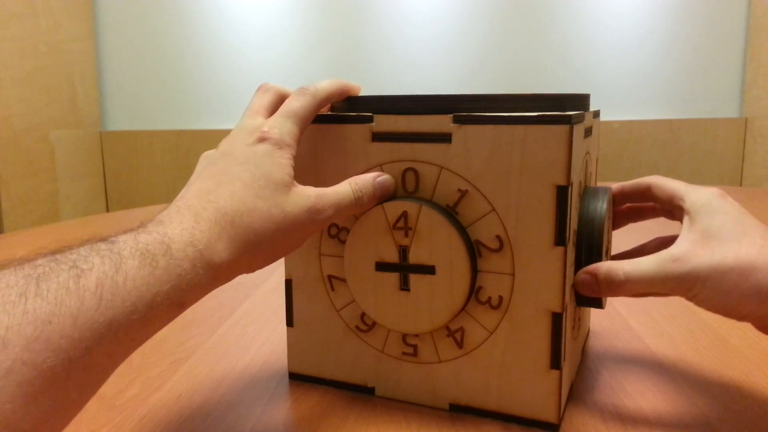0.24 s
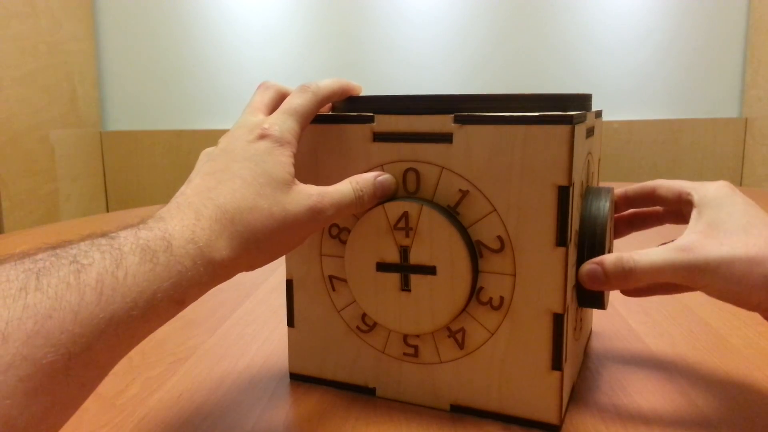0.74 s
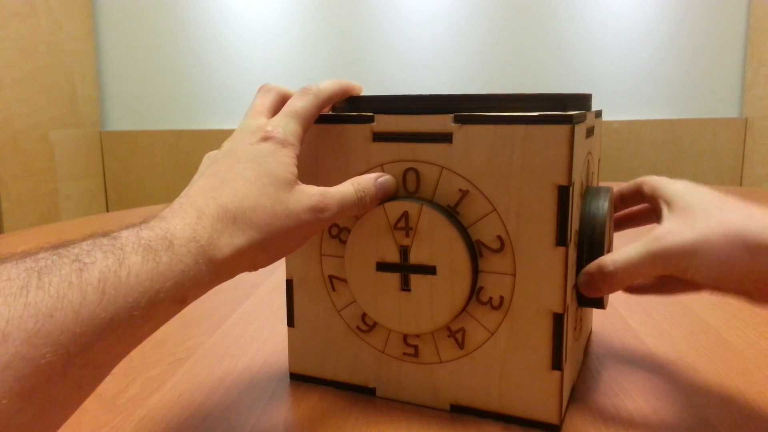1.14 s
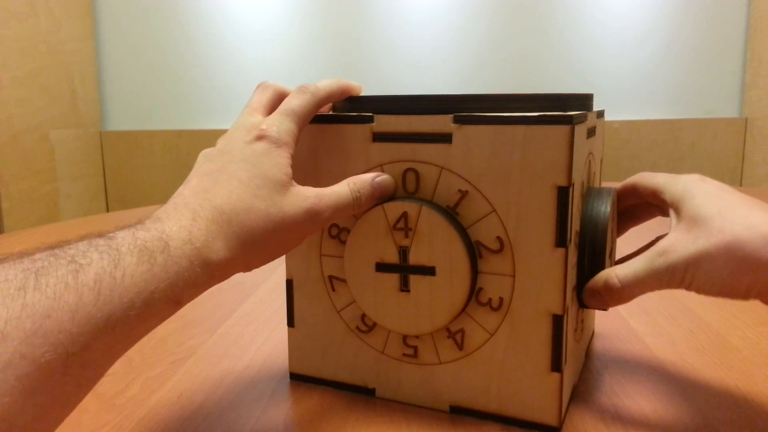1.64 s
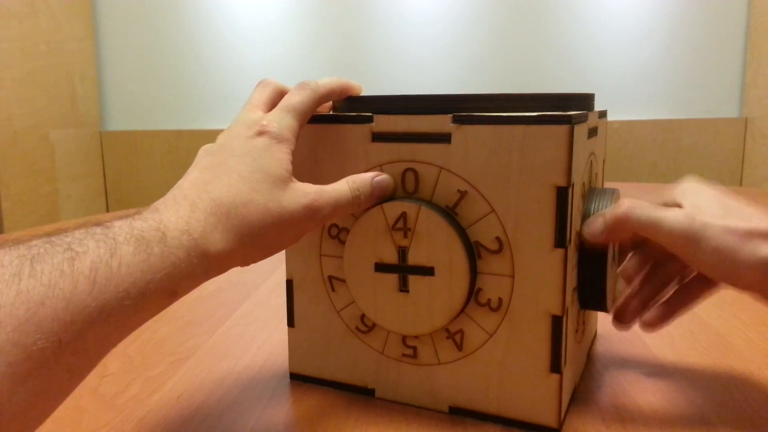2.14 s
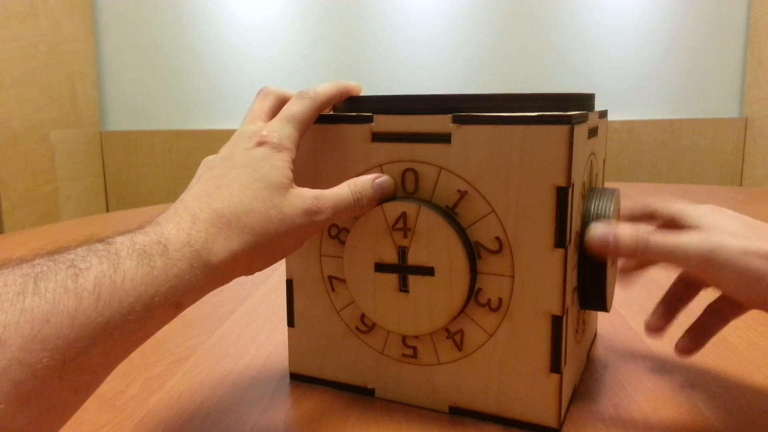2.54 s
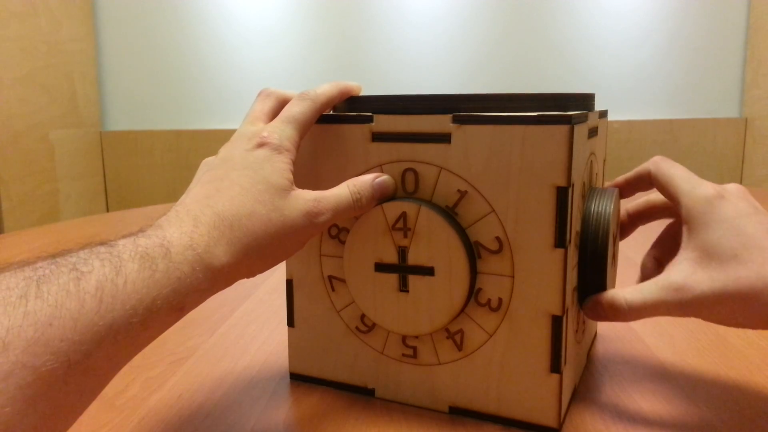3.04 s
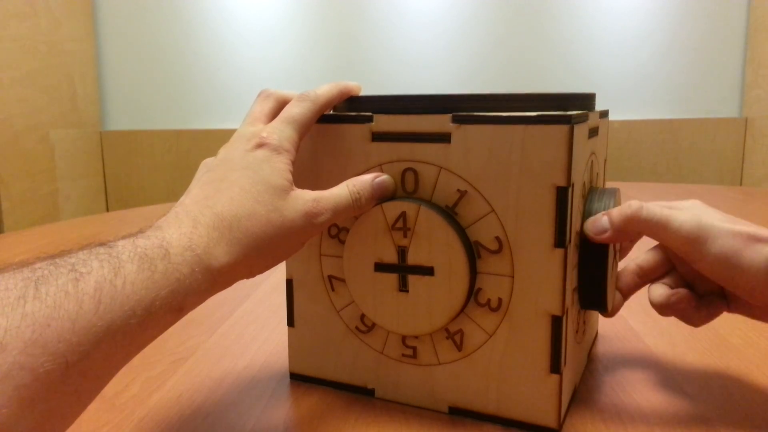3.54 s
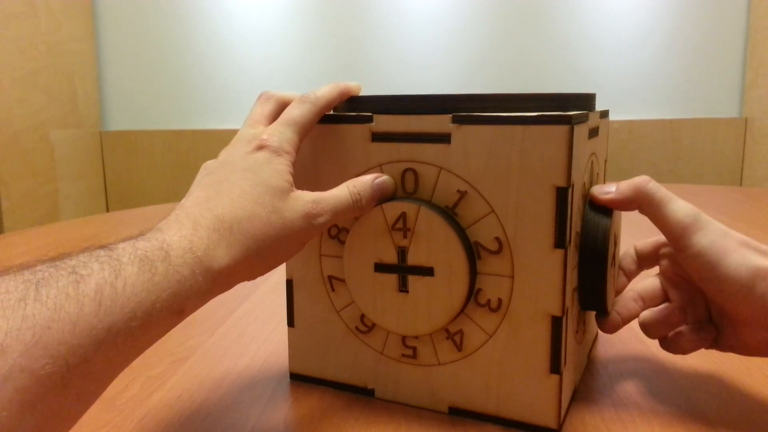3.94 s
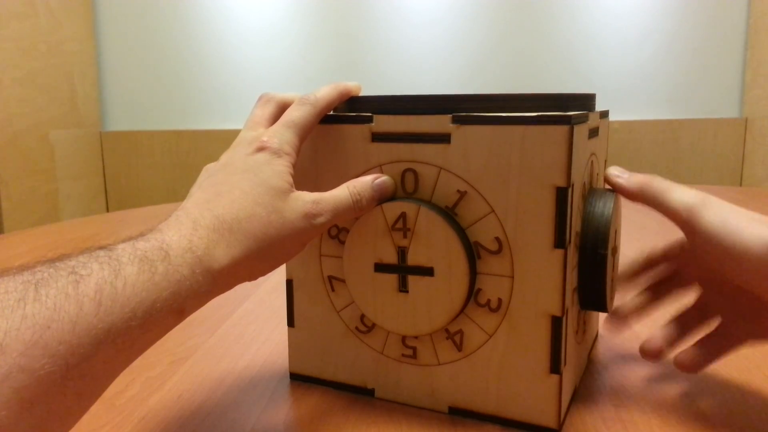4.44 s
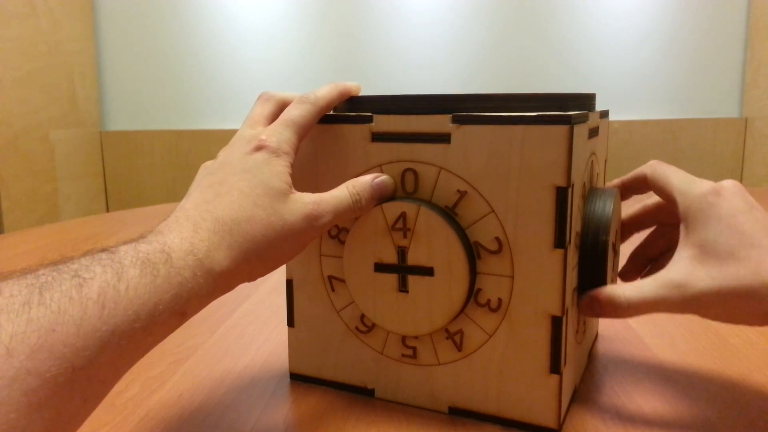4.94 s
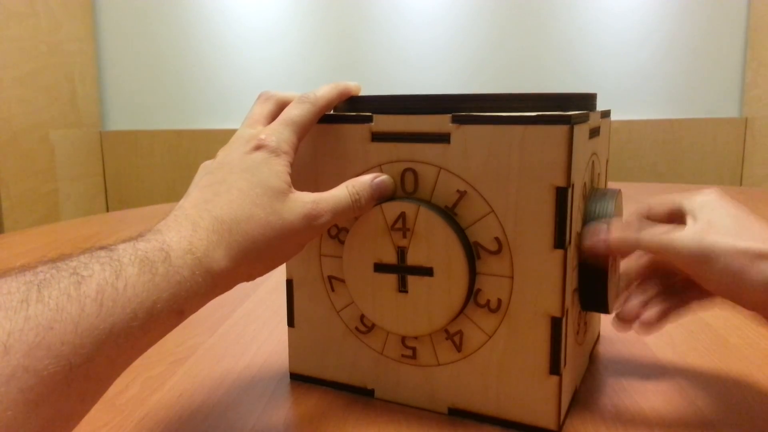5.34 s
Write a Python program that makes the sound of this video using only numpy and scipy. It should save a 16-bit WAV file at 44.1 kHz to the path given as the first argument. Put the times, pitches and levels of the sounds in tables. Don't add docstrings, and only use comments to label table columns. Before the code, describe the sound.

Close stereo pickup of a hollow plywood box on a table in a small hard room. Soft taps, ticks and faint rubbing fill the first two seconds; then a wooden dial slides and knocks into place in quick bouncing clusters, with dry scrapes before each, growing heavier towards the end over quiet hiss.

```python
import sys
import numpy as np
from scipy import signal
from scipy.fft import rfft, irfft
from scipy.io import wavfile

SR = 44100
rng = np.random.default_rng(int(sys.argv[2]) if len(sys.argv) > 2 else 0)


def transcribe(signal):
    frames = np.atleast_2d(signal).T
    limited = np.clip(frames, -1, 1)
    pcm = np.round(limited * 32767).astype(np.int16)
    wavfile.write(sys.argv[1], SR, pcm)


def nominal_scale(level):
    x = np.asarray(level, float) / 20
    return 10 ** x


N = 246959
T = np.arange(N) / SR

# [t/s, peak level/dB, struck panel f/Hz, clack level/dB]
STOPS = [
    [(2.056, -5, 298, -4), (2.078, -14.5, 490, -10), (2.098, -21, 476, 17), (2.127, -17.5, 505, -22)],
    [(2.2, -12, 406, -14), (2.214, -9.5, 403, -7)],
    [(3.277, -23, 590, -4), (3.29, -16, 546, -9)],
    [(3.519, -15.5, 516, 1.5), (3.536, -11, 387, -6), (3.546, -25, 540, -14)],
    [(3.823, -4, 550, -21), (3.841, -6, 570, -6), (3.852, -9, 485, -18), (3.87, -14.5, 420, -25)],
    [(4.212, -4.5, 505, -14.5), (4.219, -17, 297, -14), (4.234, -14, 427, -12)],
    [(5.077, -6, 418, -1.5), (5.081, -6, 600, -11.5), (5.092, -3.5, 486, -24), (5.108, -14, 312, -16)],
    [(5.408, -9, 416, -20), (5.416, -6, 615, 2), (5.427, -7, 380, -22), (5.445, -22.5, 340, -24)],
]
# [shove of the whole box level/dB, ring length left by the grip/ratio]
PUSHES = [(-11.5, 0.51), (-10, 0.52), (-11, 0.21), (-16, 0.62), (-8.5, 0.53), (-3.5, 0.69), (8.5, 0.72),
          (0, 0.48)]
# [t/s, peak level/dB, struck panel f/Hz, clack level/dB]
TAPS = [(0.033, -22, 362, -15), (0.074, -47, 430, -12), (0.175, -43, 590, 24), (0.579, -29.5, 530, -6.5),
        (0.653, -22.5, 323, -2), (0.679, -28.5, 338, -2), (0.844, -40, 270, -8), (1.15, -27.5, 550, 21),
        (1.168, -22, 520, -7), (1.222, -29, 450, 11), (1.309, -13.5, 366, -9), (1.349, -28.5, 344, -3),
        (1.476, -29, 458, -16), (1.741, -36, 363, -4), (1.804, -40, 322, 3), (1.9, -32, 570, -3),
        (2.518, -38.5, 281, -6), (4.052, -41, 513, 4), (4.449, -38.5, 295, -1), (4.622, -40.5, 297, 4),
        (4.919, -34, 517, -18)]
# [f/Hz, level/dB, t60/s]
PANELS = [(152, -9, 0.032), (236.9, -15, 0.18), (318, -3, 0.038), (352, 0, 0.045), (417.3, 5, 0.045),
          (502.6, 8, 0.059), (611, 0, 0.041), (836, -0.5, 0.017), (963, -3.5, 0.02), (1150, -59, 0.12),
          (1150, -51, 0.055), (1667, -19, 0.016)]
# [t/s, peak level/dB, ring f/Hz]
TICKS = [(0.0312, -39.5, 1840), (0.5788, -26, 2060), (0.5795, -35, 4330), (0.655, -29, 1300),
         (1.144, -30, 4230), (1.1625, -22, 2590), (1.3107, -27, 3520), (1.7417, -43, 2200),
         (1.9041, -28.5, 1820), (1.9007, -38, 1100), (2.056, -17.5, 1680), (2.057, -24.5, 4540),
         (2.066, -14, 1970), (2.2009, -11.5, 2200), (2.2098, -26, 2300), (2.226, -27, 1910),
         (3.2905, -19, 1880), (3.5386, -28, 3920), (3.822, -17.5, 3360), (3.8396, -17.5, 4630),
         (4.0514, -39, 1860), (4.2122, -5.5, 2500), (5.074, -20, 4970), (5.0813, -8, 2130),
         (5.0887, -17, 2280), (5.4265, -39, 2270)]
# [t/s, peak level/dB]
SNAPS = [(0.088, -30), (0.0974, -42), (0.5796, -58), (1.309, -35), (1.7035, -29), (2.056, -30),
         (2.1101, -15), (2.244, -20), (3.8237, -30), (4.7047, -53), (5.2294, -32), (5.5563, -36)]
# [start t/s, end t/s, rumble level at start/dB, at end/dB, rasp minus rumble/dB]
RUBS = [(0.067, 0.16, -45, -60, -15), (1.131, 1.168, -38, -36, -9), (1.187, 1.308, -38, -37, -4),
        (1.378, 1.49, -50.5, -57, 3), (1.507, 1.843, -47.5, -56, -7), (1.91, 2.047, -42, -49, -23),
        (2.062, 2.109, -30.5, -31.5, 0), (2.119, 2.161, -19.5, -39, -3), (2.145, 2.198, -39.5, -29, 11.5),
        (3.079, 3.272, -46, -37, 4.5), (3.393, 3.496, -50, -31.5, 5), (3.717, 3.819, -39, -34, 4),
        (4.053, 4.191, -42.5, -35.5, 3), (4.603, 4.755, -51.5, -59, 4.5), (4.911, 5.06, -36, -36.5, 1.5),
        (5.239, 5.387, -40, -31, 0), (5.53, 5.6, -34.5, -33, -6)]
# [t of top/s, rumble level/dB, rasp
# level/dB]
SLIPS = [
    (0.106, -43.5, -71),
    (0.178, -37, -53),
    (1.169, -46.5, -42),
    (2.206, -24, -37),
    (3.288, -23, -28.5),
    (3.537, -21, -26.5),
    (3.839, -15.5, -30.5),
    (4.217, -18, -29.5),
    (5.084, -15.5, -25),
    (5.419, -14.5, -26.5),
]
# [f/Hz, width/Hz, level/dB]
DIAL = [(1990, 700, -3.5), (2500, 320, 3.5), (2920, 880, -1), (4200, 800, 0), (5090, 630, -0.5),
        (7350, 2500, -7.5), (10850, 3500, -13.5)]
SQUEAK = 0.1756, 0.0065, 0.0062, [(864, 61, -29.5), (2660, 340, -35.5), (4470, 240, -35.5),
          (5200, 460, -60)]
# [f/Hz, t60/s, level/dB, likeness of the channels/0-1]
ROOM = [(125.3, 0.4, 3, 0.98), (306.5, 0.35, -1.5, 0.9), (713, 0.32, -0.5, 0.49), (1490, 0.35, 2.5, 0),
        (3400, 0.36, 0, 0.02), (7570, 0.34, -4, 0.1), (12000, .22, -14, 0.4)]
# [f/Hz, level per Hz/dB]
HISS = [(30, -37), (106, -7.5), (270, -2.5), (380, -7), (830, -10), (1350, -13.5), (6540, -25),
        (15000, -25)]
# [f/Hz, likeness/0-1]
HISS_ALIKE = [(60, 0.5), (300, 0.63), (1400, 0.01)]


def blows():
    rows = [(s, db, hz, -23, clack_db, 0.86) for s, db, hz, clack_db in TAPS]
    for stop, (shove_db, grip) in zip(STOPS, PUSHES):
        for k, (s, db, hz, clack_db) in enumerate(stop):
            thump_db = -22.5 if k else shove_db
            rows.append((s, db, hz, thump_db, clack_db, grip))
    return rows


def add(track, s, sound):
    i = int(s * SR)
    track[i:i + len(sound)] += sound[:N - i]


def knocks():
    focus, scatter_db, detune = 0.38, 4.5, 0.033
    push_cycles, swell_cycles, travel_s = 0.23, 0.48, 0.001496
    out, t = np.zeros(N), np.arange(5000)[:, None] / SR
    panel_hz, panel_db, panel_t60 = np.transpose(PANELS)
    for s, peak_db, struck_hz, thump_db, clack_db, grip in blows():
        near = 1 / (1 + (np.log(panel_hz / struck_hz) / focus) ** 2)
        reach = np.where(panel_hz > 700, nominal_scale(clack_db + 15.5), near)
        reach = np.where(panel_hz < 250, nominal_scale(thump_db + 17.5), reach)
        hz = np.append(panel_hz, struck_hz)
        gain = np.append(nominal_scale(panel_db) * reach, nominal_scale(4.5))
        t60 = np.append(panel_t60, 0.045) * np.clip(grip, 0.2, 2.5)
        level_chance, pitch_chance = rng.standard_normal((2, len(hz)))
        decay = np.exp(-np.log(1000) * t / t60)
        modes = np.sin(2 * np.pi * hz * (1 + detune * pitch_chance) * t) * decay
        swell = 1 - np.exp(-t[:, 0] * struck_hz / swell_cycles)
        blow = swell * (modes @ (gain * nominal_scale(scatter_db * level_chance)))
        push = np.hanning(int(push_cycles * SR / struck_hz) + 3)
        blow = np.convolve(blow, push)
        add(out, s + travel_s, nominal_scale(peak_db) * blow / np.abs(blow).max())
    return out


def ring(x, hz, width_hz):
    return signal.lfilter(*signal.iirpeak(hz, hz / width_hz, fs=SR), x)


def crack(decay_s, first):
    t = np.arange(900) / SR
    splinters = rng.standard_normal(len(t)) * np.exp(-t / decay_s) * np.minimum(t / 0.0005, 1)
    splinters[20] += first
    return splinters


def ticks():
    out, width_hz = np.zeros(N), 900
    for s, peak_db, hz in TICKS:
        tick = ring(ring(crack(0.0034, 12.0), hz, width_hz), hz, 2.5 * width_hz)
        add(out, s, nominal_scale(peak_db) * tick / np.abs(tick).max())
    return out


def snaps():
    out = np.zeros(N)
    for s, peak_db in SNAPS:
        snap = ring(crack(0.0012, 3.0), 7500, 8000)
        add(out, s, nominal_scale(peak_db) * snap / np.abs(snap).max())
    return out


def friction(per_s, spread_db):
    catch = rng.random(N) < per_s / SR
    return catch * rng.standard_normal(N) * nominal_scale(spread_db * rng.exponential(size=N))


def unit(x):
    return x / np.sqrt(np.mean(x ** 2))


def surge(s, rise_s, fall_s):
    return np.exp(-np.where(T < s, (s - T) / rise_s, (T - s) / fall_s))


def rubbing():
    fibres = friction(2500, 1.5)
    rumble = unit(sum(nominal_scale(db) * ring(fibres, hz, 1.9 / t60) for hz, db, t60 in PANELS))
    fibres = friction(6000, 2.2)
    rasp = np.zeros(N)
    for k, (hz, width_hz, db) in enumerate(DIAL):
        rasp += (-1) ** k * nominal_scale(db) * ring(fibres, hz, width_hz)
    rumble_gain, rasp_gain = np.zeros(N), np.zeros(N)
    touch_s, linger_s = 0.011, 0.032
    for start, end, start_db, end_db, rel_db in RUBS:
        db = np.interp(T, (start, end), (start_db, end_db))
        touch = np.clip(np.minimum(T - start, end + linger_s - T) / touch_s, 0, 1)
        rumble_gain += touch * nominal_scale(db - 7)
        rasp_gain += touch * nominal_scale(db + rel_db - 12.5)
    for s, rumble_db, rasp_db in SLIPS:
        rumble_gain += nominal_scale(rumble_db) * surge(s, 0.0076, 0.011)
        rasp_gain += nominal_scale(rasp_db) * surge(s, 0.014, 0.012)
    return rumble_gain * rumble + rasp_gain * unit(rasp)


def squeak():
    s, rise_s, fall_s, overtones = SQUEAK
    chatter = friction(3000, 0.95)
    tones = sum(nominal_scale(db) * unit(ring(chatter, hz, width_hz)) for hz, width_hz, db in overtones)
    return surge(s, rise_s, fall_s) * tones


def stereo(mid, side, alike):
    c = np.clip(alike, 0, 1)
    return np.sqrt(1 + c) * mid + np.sqrt(1 - c) * side * np.array([[1], [-1]])


def echoes():
    gap_s, build_s, edge_s = 0.0025, 0.00075, 0.005
    t = np.arange(22000) / SR
    edges = rng.standard_normal((2, len(t))) * np.exp(-t / edge_s)
    edges = signal.sosfilt(signal.butter(2, 4000, "high", fs=SR, output="sos"), edges)
    tail = edges / np.linalg.norm(edges, axis=1, keepdims=True)
    build = 1 - np.exp(-np.maximum(t - gap_s, 0) / build_s)
    for hz, t60, db, alike in ROOM:
        limits = [hz / 1.357, min(hz * 1.484, 0.45 * SR)]
        band = signal.butter(2, limits, "band", fs=SR, output="sos")
        mid, side = signal.sosfilt(band, rng.standard_normal((2, len(t))))
        fade = np.exp(-np.log(1000) * t / t60) * build
        tail = tail + nominal_scale(db) * stereo(mid, side, alike) * fade / np.sqrt(2 * np.sum(fade ** 2))
    return tail


def room(x):
    count, spot_s = 6, 0.013
    spot = T / spot_s % count
    out = np.zeros((2, N))
    for k in range(count):
        apart = np.abs((spot - k + count / 2) % count - count / 2)
        share = np.cos(np.pi / 2 * np.minimum(apart, 1))
        out += signal.fftconvolve((x * share)[None], echoes(), axes=1)[:, :N]
    return out


def hiss():
    log_hz = np.log(np.fft.rfftfreq(N, 1 / SR) + 1)
    hz, db = np.transpose(HISS)
    colour = nominal_scale(np.interp(log_hz, np.log(hz), db))
    hz, likeness = np.transpose(HISS_ALIKE)
    alike = np.interp(log_hz, np.log(hz), likeness)
    mid, side = rfft(rng.standard_normal((2, N)))
    both = irfft(colour * stereo(mid, side, alike), N)
    return both * nominal_scale(-53.5) / np.std(both.mean(axis=0))


def scene():
    box = knocks() + ticks() + snaps() + rubbing() + squeak()
    box = signal.sosfilt(signal.butter(4, 128, "high", fs=SR, output="sos"), box)
    box = signal.sosfilt(signal.butter(2, 11500, fs=SR, output="sos"), box)
    left_db, right_lag = 1, 3
    direct = np.array([box * nominal_scale(left_db), np.roll(box, right_lag) * nominal_scale(-left_db)])
    return nominal_scale(1) * direct + room(box) + hiss()


def top_cut(x):
    return signal.sosfilt(signal.butter(12, 15550, fs=SR, output="sos"), x)


def record(dry):
    rounded = np.tanh(0.9 * dry) / 0.9
    top = signal.ellip(8, 0.2, 45, 14600, fs=SR, output="sos")
    return top_cut(signal.sosfilt(top, rounded))


dry = scene()
out = record(dry)
transcribe(out)
```